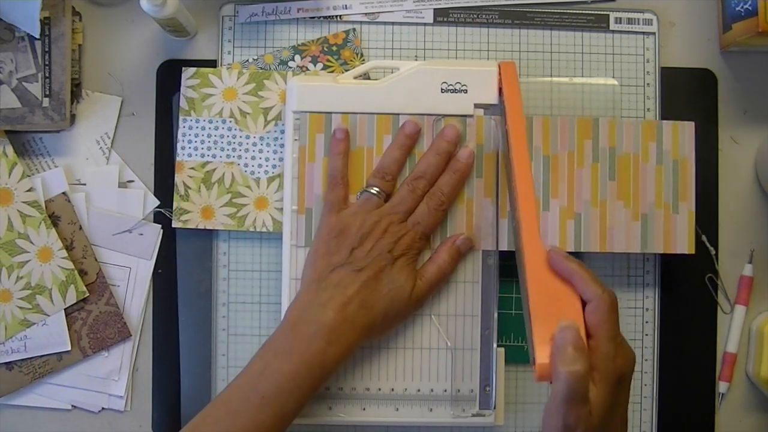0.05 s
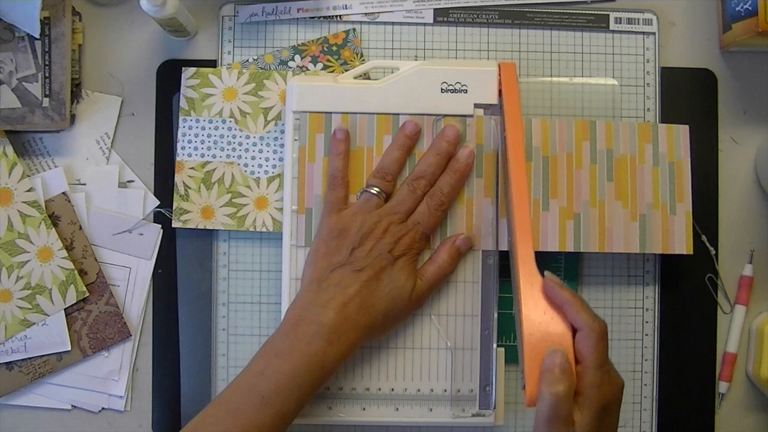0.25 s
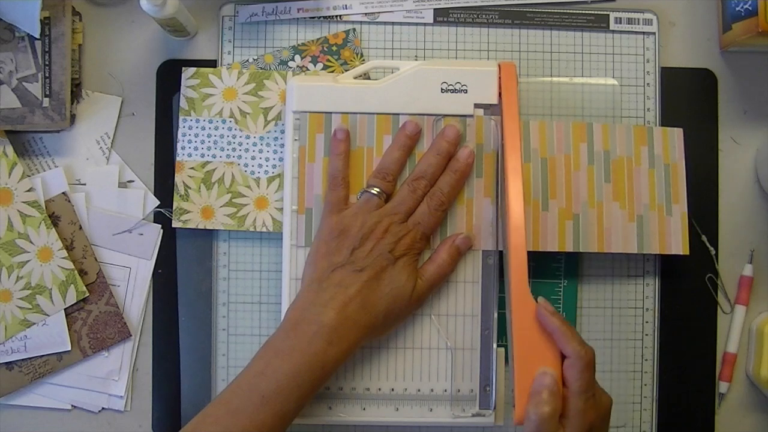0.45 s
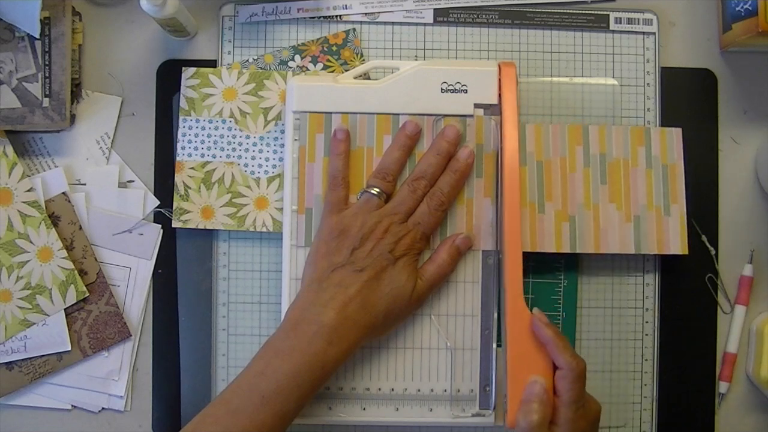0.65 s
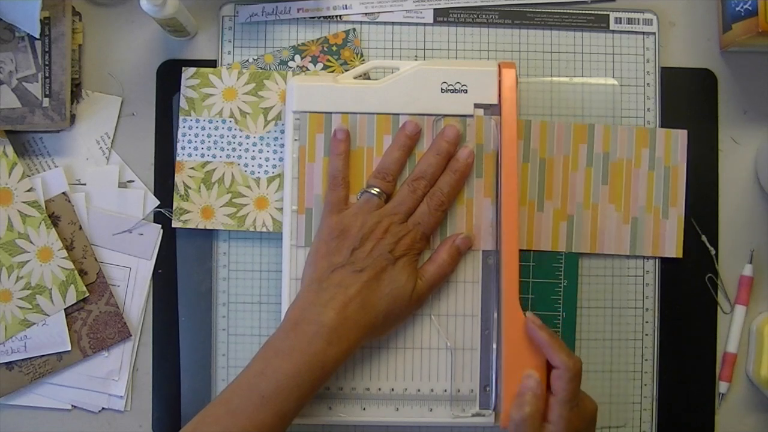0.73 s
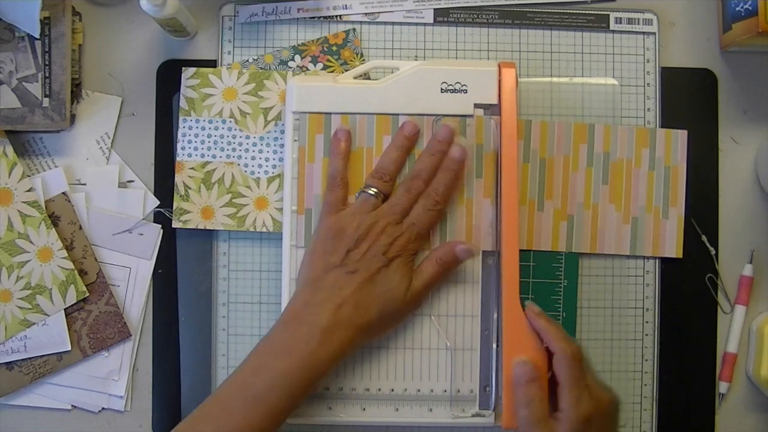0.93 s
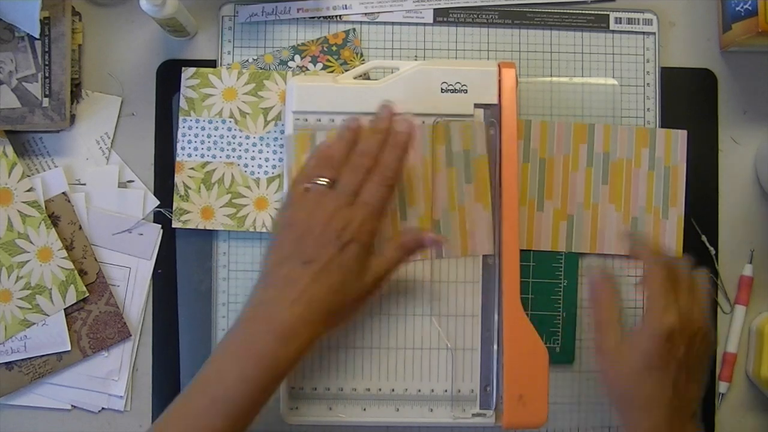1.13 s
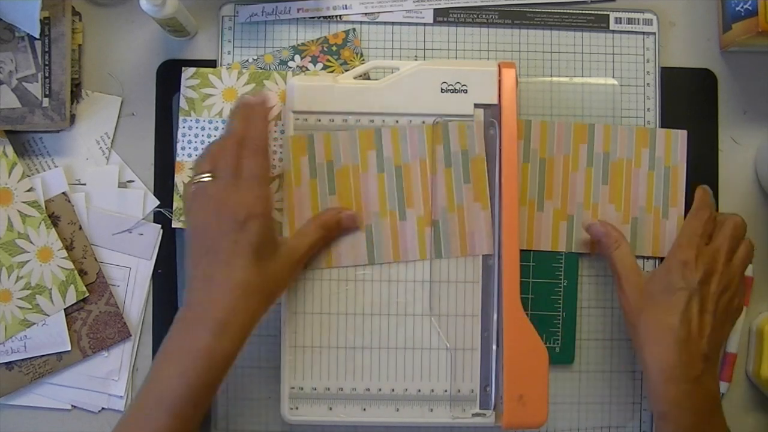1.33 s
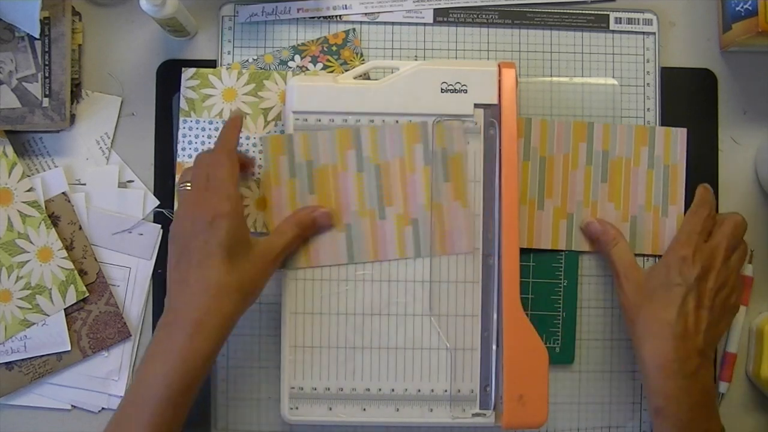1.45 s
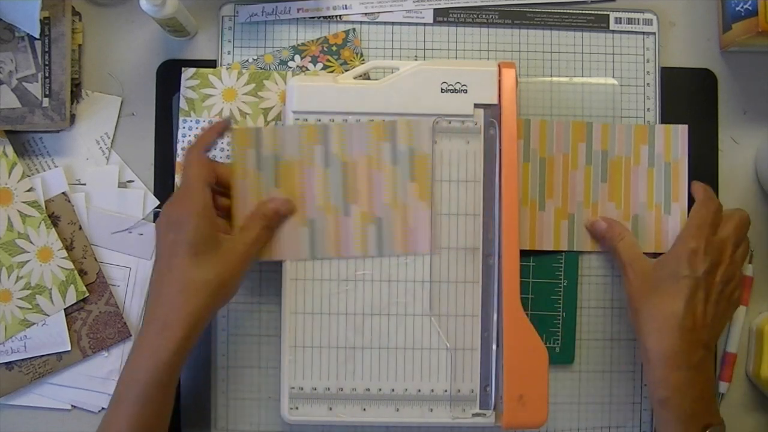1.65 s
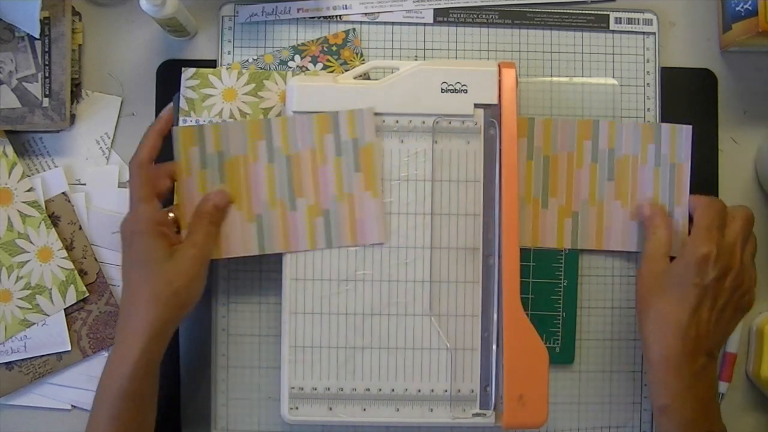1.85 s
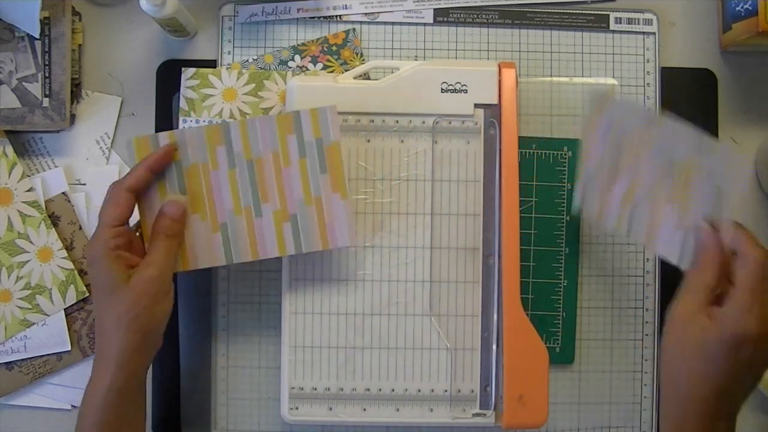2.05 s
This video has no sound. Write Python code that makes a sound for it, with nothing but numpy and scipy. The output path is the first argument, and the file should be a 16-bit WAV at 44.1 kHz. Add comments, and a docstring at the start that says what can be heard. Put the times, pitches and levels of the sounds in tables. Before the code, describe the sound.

A paper trimmer blade crunches through card, knocks down, and the pieces slide away.

```python
"""Paper trimmer cutting card

A lever trimmer on a craft table cuts a strip of card: fibres snap ever harder under the blade and
ring the arm and the plastic bed. The blade scrapes down the steel edge and the lever knocks home.
Fingers brush the card, then the two halves are slid off and lifted, their edges ticking and singing.
A small dry room, a stereo microphone overhead."""
import sys
import numpy as np
from scipy import signal
from scipy.fft import rfft, irfft, next_fast_len
from scipy.io import wavfile
from scipy.ndimage import map_coordinates

SR = 44100
rng = np.random.default_rng(int(sys.argv[2]) if len(sys.argv) > 2 else 0)


def to_wav(s):
    """Save 16-bit WAV."""
    ch = np.atleast_2d(s).T  # columns
    pcm = np.round(np.clip(ch, -1, 1) * 32767)  # PCM
    wavfile.write(sys.argv[1], SR, pcm.astype(np.int16))


N = 92610


def amp(db):
    """Decibels to gain."""
    return 10 ** (np.asarray(db) / 20)


def unit(x):
    """Scaled to rms 1."""
    return x / np.sqrt(np.mean(x ** 2) + 1e-20)


def along(points, hz):
    """Reads (Hz, value) points on a log frequency axis."""
    freqs, values = np.transpose(points)
    return np.interp(np.log(hz + 1), np.log(freqs + 1), values)


def curve(rows):
    """Automation from (s, value) points, one value per sample."""
    return np.interp(np.arange(N) / SR, *np.transpose(rows))


def gate(start, end, attack_s=0.0035, release_db_per_s=497):
    """Opens quickly at the start and dies away after the end."""
    t = np.arange(N) / SR
    return amp(-release_db_per_s * np.maximum(t - end, 0)) * np.clip((t - start) / attack_s, 0, 1)


def stroke(rows):
    """Gain of a movement from its (s, dB) points, gated at both ends."""
    return amp(curve(rows)) * gate(rows[0][0], rows[-1][0])


def crossfades(times):
    """Equal-power fades that each peak at one of the times."""
    return [np.sin(np.pi / 2 * np.interp(np.arange(N) / SR, times, row)) for row in np.eye(len(times))]


def add(track, s, sound):
    """Mixes a sound in at time s."""
    i = round(s * SR)
    track[i:i + len(sound)] += sound[:max(N - i, 0)]


def filtered(x, response):
    """x times a complex response of frequency."""
    size = 2 * next_fast_len(N // 2 + 8192)
    return irfft(rfft(x, size) * response(np.fft.rfftfreq(size, 1 / SR)), size)[..., :N]


def coloured(x, points):
    """x through a minimum-phase EQ with the given (Hz, dB) shape."""
    def response(hz):
        cepstrum = irfft(np.log(amp(along(points, hz))))
        half = len(cepstrum) // 2
        cepstrum[1:half] *= 2
        cepstrum[half + 1:] = 0
        return np.exp(rfft(cepstrum))
    return filtered(x, response)


def resonance(x, hz, width_hz):
    """x through a steep-sided resonance, at rms 1."""
    return unit(filtered(x, lambda f: (1j * f * width_hz / (hz * hz - f * f + 1j * f * width_hz)) ** 2))


def scatter(x, t60):
    """x smeared by a dense cluster of close reflections."""
    t = np.arange(SR // 8) / SR
    tail = rng.standard_normal(len(t)) * amp(-60 * t / t60) * (t > .0004)
    return signal.fftconvolve(x, tail / np.linalg.norm(tail))[:N]


def spread(x, t60, early_db, early_from_hz=970):
    """Stereo image: direct sound, the table's reflections in the treble, width growing with pitch."""
    # stereo width, side against direct sound: freq_hz, gain_db
    width = [(100, -13.5), (400, -14.5), (800, -14.5), (1500, -9.5), (3000, -5.5), (8000, -3.5),
             (14000, -2.5)]
    early = filtered(scatter(x, t60), lambda hz: 1 - 1 / (1 + (hz / early_from_hz) ** 2))
    mid = x + amp(early_db) * early
    side = filtered(scatter(x, t60), lambda hz: amp(along(width, hz)))
    return np.array([mid + side, mid - side]) / np.hypot(1, amp(early_db) / 2)


def pan(x, db):
    """Left louder than right by db."""
    return x * amp(np.array([[.5], [-.5]]) * db)


def snaps(per_s, vary_db, hiss):
    """Random tiny impulses of uneven size over smooth friction noise."""
    chance, size, polarity = rng.random(N), rng.standard_normal(N), np.sign(rng.standard_normal(N))
    impulses = (chance < per_s / SR) * polarity * amp(vary_db * np.clip(size, -2, 2))
    return unit(unit(impulses) + hiss * rng.standard_normal(N))


def rub(colour, per_s, vary_db, hiss):
    """Steady stereo friction of rms 1: small slips through a surface's colour."""
    return unit(spread(coloured(snaps(per_s, vary_db, hiss), colour), t60=0.027, early_db=-3))


def clicks(rows, colour, t60):
    """A short burst of slips at each (s, dB) row."""
    track, t = np.zeros(N), np.arange(SR // 10) / SR
    for s, db in rows:
        add(track, s, amp(db - 60 * t / t60) * rng.standard_normal(len(t)))
    return spread(coloured(track, colour), t60=0.25, early_db=-8.5)


def room_tone():
    """The room's steady noise, at rms 1."""
    # noise floor: freq_hz, gain_db
    colour = [(18, -81.5), (30, -56.5), (295, -16), (486, -13), (684, -5), (2060, -3.5), (2980, -14.5),
              (3310, 0), (4190, -16.5), (10200, -22.5), (16000, -42)]
    return unit(spread(coloured(rng.standard_normal(N), colour), t60=.03, early_db=-6.5))


def room_reverb(x):
    """A short tail; each frequency dies at its own speed."""
    # the room's decay: freq_hz, t60_s
    decay = [(200, 0.18), (2000, 0.15), (10000, 0.073)]
    hz, t, spectrum = signal.stft(rng.standard_normal((2, SR // 2)), SR, nperseg=256)
    tail = signal.istft(spectrum * amp(-60 * t / along(decay, hz)[:, None]), SR, nperseg=256)[1]
    return signal.fftconvolve(x, tail / np.linalg.norm(tail[0]), axes=1)[:, :N]


def card_whistle(half_width_hz=380):
    """The card's dragging edge sings thinly: a narrow band of friction that sinks in pitch."""
    # the singing edge: time_s, pitch_hz, level_db
    glide = [(1.86, 7600, -38), (1.89, 7500, -50), (1.931, 7440, -47), (1.97, 7300, -40), (2.0, 7460, -41),
             (2.051, 7340, -56), (2.075, 7060, -46), (2.1, 6960, -58)]
    glide = np.array(glide)
    pitch_hz = curve(glide[:, :2])
    flutter = filtered(rng.standard_normal(N), lambda hz: 1 / (1 + (hz / half_width_hz) ** 2))
    tone = unit(flutter * np.sin(2 * np.pi * np.cumsum(pitch_hz) / SR))
    return spread(tone * stroke(glide[:, ::2]), t60=0.037, early_db=-15)


def card_ring():
    """Rubbing wakes the stiff card's resonance once it is off the bed."""
    # swell of the ring: time_s, level_db
    envelope = [(1.79, -42), (1.835, -29), (1.865, -32), (1.9, -42.5), (1.95, -47), (1.98, -58), (2.0, -38),
                (2.04, -70), (2.07, -50), (2.1, -37)]
    ring = resonance(snaps(per_s=1600, vary_db=6.3, hiss=.4), hz=2200, width_hz=460)
    return spread(ring * stroke(envelope), t60=0.026, early_db=-9)


def finger_brush():
    """Fingers brush the card with a high, grainy hiss."""
    # finger strokes: time_s, level_db
    envelope = [(1.05, -47), (1.085, -35), (1.11, -25.5), (1.125, -47.5), (1.15, -41.5), (1.18, -54),
                (1.215, -43), (1.25, -54), (1.275, -100), (1.301, -88), (1.305, -34.5), (1.318, -45),
                (1.37, -42), (1.42, -47.5), (1.6, -49), (1.63, -43), (1.65, -61)]
    # skin on card: freq_hz, gain_db
    colour = [(1180, -78), (2000, -48.5), (3090, -23.5), (5350, -38), (5490, -18), (8480, -5), (11700, -2),
              (16000, -24)]
    return stroke(envelope) * rub(colour, per_s=4900, vary_db=20, hiss=0.71)


def card_slide():
    """The card slides over the bed with an even rasp."""
    # the push: time_s, level_db
    envelope = [(1.405, -52), (1.421, -23), (1.453, -31), (1.487, -29), (1.497, -20.5), (1.513, -19),
                (1.559, -32.5), (1.565, -30.5), (1.639, -53.5), (1.665, -63.5)]
    # card on plastic: freq_hz, gain_db
    colour = [(100, -33.5), (200, -43), (300, -9.5), (500, -7), (720, 0), (1000, -4.5), (1600, -0.5),
              (2400, 1), (3300, 0.5), (4300, -5.5), (7000, -7.5), (11500, -7.5), (13500, -18),
              (15500, -22.5)]
    return pan(stroke(envelope) * rub(colour, per_s=2400, vary_db=0.5, hiss=0.47), db=1.3)


def card_lift():
    """Both halves are drawn away; their friction loses its bass as they leave the bed."""
    # the pull: time_s, level_db
    envelope = [(1.675, -69), (1.687, -40.5), (1.711, -29), (1.754, -27.5), (1.759, -27), (1.803, -31),
                (1.831, -23), (1.951, -43.5), (1.985, -45.5), (1.995, -36), (2.053, -52.5), (2.065, -32.5),
                (2.1, -32)]
    # card lying flat, then raised: freq_hz, gain_db
    flat = [(88, -68), (150, -49), (494, -5), (589, -0.5), (1040, 1), (1120, -3), (2100, -4.5),
            (3420, -14.5), (4320, -5.5), (6510, -11), (11300, -9), (16000, -26.5)]
    raised = [(200, -54), (500, -28), (700, -16), (1000, -6.5), (1500, -2), (2150, -4.5), (3000, -6.5),
              (4000, -5), (6000, -5.5), (7500, -9.5), (8700, -5), (10800, -4), (13000, -13), (15500, -19)]
    # leaving the bed: flat_s, raised_s
    stages = [1.794, 1.807]
    # drift to the right and back: time_s, left_over_right_db
    drift = [(1.7, 0), (1.85, -1), (1.95, -1.5), (1.995, -7), (2.06, -0.5)]
    friction = sum(fade * rub(colour, per_s=1800, vary_db=5, hiss=0.34)
                   for fade, colour in zip(crossfades(stages), [flat, raised]))
    return pan(amp(-1.1) * stroke(envelope) * friction, db=curve(drift))


def card_ticks():
    """The card's edge ticks crisply as it is handled."""
    # edge ticks: start_s, level_db
    hits = [(1.087, -20), (1.099, -38.5), (1.108, -20), (1.420, -12.5), (1.492, -12.5), (1.509, -28.5),
            (1.583, -22), (1.7565, -16.5), (1.989, -23), (2.066, -37)]
    # their crisp tone: freq_hz, gain_db
    colour = [(150, -56), (500, -37.5), (2000, -27), (4000, 4), (6000, 5.5), (11500, -17.5), (16000, -17)]
    return amp(-2) * clicks(hits, colour, t60=0.017)


def body_knocks(attack_s=0.0023, clatter_t60_s=0.051):
    """Each contact rings the body's modes around its own centre, with a short clatter."""
    # modes of the trimmer's body: pitch_hz, level_db, t60_s
    modes = [(302, -12.5, 0.12), (457, -3, 0.049), (536, 0, 0.033), (731, 4, 0.059), (948, 0.5, 0.05),
             (1210, -4.5, 0.042), (1270, -14, 0.13), (1835, -3.5, 0.053), (2033, 5, 0.037),
             (2350, -14, 0.081), (3330, 5.5, 0.024)]
    # lever, hand and card landing: start_s, level_db, centre_hz, width_octaves, clatter_db, decay_ratio
    hits = [(.981, -20.5, 2120, .3, -12, 0.67), (1.001, -28, 3420, 0.34, -31, 1.6),
            (1.0, -28.5, 596, 1.43, 8, 0.95), (1.014, -16.5, 604, 1.2, 4, 0.62),
            (1.0595, -15.5, 1760, 1.25, -0.5, 0.81), (1.092, -15.5, 740, .3, -13.5, 0.34),
            (1.103, -18, 1860, 0.12, -6, 1.1), (1.108, -22.5, 497, 1.6, -5, 0.44),
            (1.155, -10, 554, 0.25, -7, 0.76), (1.156, -19.5, 1620, 0.32, -9.5, 0.68),
            (1.289, -53.5, 565, 0.94, 7, 1.6), (1.361, -22.5, 2230, 0.54, -15, 1.06),
            (1.362, -37, 715, 0.61, 3, 1.5), (1.421, -16.5, 290, 1.17, -8, 0.74),
            (1.432, -22.5, 300, 1.9, 3, 0.81), (1.519, -26, 414, 0.74, 6.5, 0.86),
            (1.494, -19, 2980, .4, 5, .7), (1.565, -26.5, 1880, .22, 5.5, 1),
            (1.756, -20, 2030, 0.53, 5.5, 0.86), (1.765, -22.5, 1360, 1.17, -1, 1.8),
            (1.915, -21, 2245, 0.14, 2, 0.54), (1.988, -41.5, 1150, 0.19, 7, 0.83),
            (1.988, -34, 3340, 0.22, -5.5, 2.6), (2.094, -18, 933, 0.097, 8, 0.33)]
    track, t = np.zeros(N), np.arange(SR // 5) / SR
    hz = np.fft.rfftfreq(len(t), 1 / SR) + 1
    for s, db, centre_hz, octaves, clatter_db, decay_ratio in hits:
        def band(f):
            return 1 / (1 + (np.log2(f / centre_hz) / octaves) ** 4)
        ring = 0
        for pitch_hz, mode_db, t60 in modes:
            decay = amp(mode_db + rng.normal(0, 1) - 60 * t / (t60 * decay_ratio))
            ring += band(pitch_hz) * decay * np.sin(2 * np.pi * (pitch_hz * t + rng.random()))
        noise = unit(irfft(rfft(rng.standard_normal(len(t))) * band(hz), len(t)))
        clatter = noise * amp(clatter_db - 60 * t / (clatter_t60_s * decay_ratio))
        add(track, s, amp(db - 8) * (ring + clatter) * (1 - np.exp(-t / attack_s)))
    colour = [(60, -22.5), (220, 3.0), (5000, 6.5), (12000, -27)]  # freq_hz, gain_db
    return spread(coloured(track, colour), t60=0.0082, early_db=-11)


def blade_scrape(treble_hz=3700):
    """Past the card the blade rubs the steel edge, brighter when pressed, and catches now and then."""
    # the blade's run down the edge: time_s, level_db, treble_db
    run = [(0.73, -57, 0), (0.77, -25.5, -0.5), (0.815, -24, 10.5), (0.832, -19.5, 8.5), (0.843, -24.5, 1),
           (0.865, -25.5, -3), (0.883, -20, 6), (0.904, -25.5, -4.5), (0.923, -23.5, -8),
           (0.972, -32.5, -8), (0.991, -35, -22), (1.05, -37.5, -14), (1.106, -31.5, -16),
           (1.138, -49, -2.5), (1.27, -70, -11.5)]
    # steel on steel: freq_hz, gain_db
    steel = [(100, -26.5), (200, -28.5), (400, -13.5), (700, 3.5), (950, -3), (1300, 3), (2300, 2),
             (2900, -4), (3300, -0.5), (5000, -10), (6000, -12.5), (9000, -14), (12000, -20.5),
             (15500, -37)]
    # the edge catches and slips: start_s, level_db
    catches = [(0.758, -19.5), (0.912, -13.5), (0.922, -28), (0.947, -22.5), (0.961, -19.5), (0.999, -17),
               (1.036, -28), (1.045, -25.5)]
    # tone of a catch: freq_hz, gain_db
    catch_colour = [(200, -26), (1000, -24.5), (3500, 4), (5000, -10), (6700, 0), (9000, -3.5),
                    (10300, -12), (12000, -5.5), (16000, -31)]
    run = np.array(run)
    level, treble_gain = stroke(run[:, :2]), amp(curve(run[:, ::2]))
    friction = rub(steel, per_s=1800, vary_db=2, hiss=0.8)
    treble = filtered(friction, lambda hz: 1 - 1 / (1 + (hz / treble_hz) ** 4))
    rubbing = level * (friction + (treble_gain - 1) * treble)
    return pan(rubbing, db=1) + clicks(catches, catch_colour, t60=0.036)


def blade_bite():
    """The blade first bites the card with a thin steely tick."""
    # first contact: start_s, level_db
    hits = [(.097, -27)]
    # its steely tone: freq_hz, gain_db
    colour = [(300, -47), (1400, -29), (2100, -10), (2900, -24), (3310, 12.5), (3800, -33), (8000, -6.5),
              (11500, -12), (13000, -31)]
    return clicks(hits, colour, t60=0.067)


def arm_judders(swell_s=0.0083):
    """Each judder of the arm swells the bed's hollow note and lets it die."""
    # booms of the bed: start_s, peak_db, pitch_hz
    booms = [(.131, -44.5, 714), (.211, -24.5, 710), (.265, -22, 740), (.298, -25.5, 754),
             (.356, -27.5, 734), (.451, -13.5, 769.5), (.491, -19.5, 731), (.533, -14, 739),
             (.562, -16.5, 739), (.587, -14.5, 728), (.692, -20, 720), (.779, -29, 713)]
    track, t = np.zeros(N), np.arange(SR // 8) / SR
    swell = (t / swell_s * np.exp(1 - t / swell_s)) ** 2
    for s, db, hz in booms:
        add(track, s, amp(db) * swell * np.sin(2 * np.pi * (hz * t + rng.random())))
    return pan(track, db=1.9)


def bed_rumble():
    """The hollow plastic bed rumbles under the cut."""
    # the bed's bass against the cut: time_s, level_db
    envelope = [(0.1, -45), (0.2, -67), (0.23, -24), (0.35, -38), (0.45, -16), (0.62, -22.5), (0.73, -14),
                (0.78, -26)]
    # hollow plastic: freq_hz, gain_db
    colour = [(30, -23), (110, -29.5), (200, -11), (430, 11.5), (560, 9.0), (900, -28.5), (3000, -61.5)]
    rumble = coloured(snaps(per_s=1300, vary_db=5.5, hiss=1), colour)
    return pan(amp(curve(envelope)) * unit(spread(rumble, t60=0.023, early_db=-17.5)), db=2.5)


def arm_ring():
    """The travelling cutting point wakes one resonance of arm and blade after another, in mono."""
    # resonances of arm and blade: pitch_hz, width_hz, level_db, peak_s, reach_s
    modes = [(742.4, 51, -15, 0.49, 0.43), (584, 220, -15.5, .71, 0.11), (1156, 60, -18, 0.35, .2),
             (1302, 84, -13, .68, 0.11), (1675, 93, -7.5, .61, 0.12), (1903, 55, -4.5, 0.447, 0.051),
             (2072, 170, -9, 0.17, 0.21), (2383, 170, -4.5, 0.713, 0.04), (3082, 36, -11.5, .41, 0.078),
             (3295, 120, -8.5, 0.14, 0.24), (3496, 170, -18.5, .57, .05), (4037, 57, -13.5, 0.698, 0.078),
             (4520, 120, -16, .16, .1), (4770, 240, -12, .63, 0.066), (5990, 110, -20, .21, 0.26),
             (6600, 600, -7.5, .74, .04), (8000, 870, -11.5, .66, .05), (8950, 810, -13.5, .51, .07),
             (10400, 900, -14.5, .41, .06)]
    t = np.arange(N) / SR
    shaking = snaps(per_s=1600, vary_db=0.5, hiss=0.81)
    return sum(amp(db) * np.exp(-((t - peak_s) / reach_s) ** 2) * resonance(shaking, hz, width_hz)
               for hz, width_hz, db, peak_s, reach_s in modes)


def fibre_cracks():
    """Tough bundles of fibres crack under the blade."""
    # bundles giving way: start_s, level_db
    hits = [(.456, -17.5), (.6, -18), (.648, -14.5), (.6655, -10), (.671, -9.5), (.7015, -4), (.7215, -17),
            (.738, -25.5)]
    # tone of a crack: freq_hz, gain_db
    colour = [(80, -36), (200, -18.5), (600, -8), (1700, 5.5), (3000, -0.5), (4800, 8), (15500, -12.5)]
    return clicks(hits, colour, t60=0.0061)


def fibre_crunch(clumps_per_s=260, clump_db=1.2):
    """Fibres snap in clumps, changing colour as the cut travels away from the pivot."""
    # the cut near the pivot, midway and at the far edge: freq_hz, gain_db
    near = [(100, -41.5), (200, -31.5), (600, -13), (950, -10.5), (1200, -7.5), (2200, 4.5), (2750, -16),
            (3600, -11), (6000, -13.5), (11700, -13.5), (13000, -30), (15500, -29.5)]
    midway = [(100, -53), (200, -14), (400, -16), (700, -2.5), (950, -12), (1250, -1), (2100, -2),
              (2750, -8.5), (5500, -14), (9000, -17.5), (13000, -28.5), (15500, -31)]
    far = [(100, -45), (200, -22.5), (400, -9), (600, 4.5), (930, -3.5), (1300, 1.5), (2300, 0), (3200, -8),
           (4850, -9.5), (6100, -18.5), (8700, -13), (11000, -12), (15500, -31.5)]
    # when each colour leads: near_s, midway_s, far_s
    stages = [0.12, 0.53, 0.61]
    t = np.arange(N) / SR
    clumps = amp(clump_db * map_coordinates(rng.standard_normal(N), [t * clumps_per_s], order=1))
    fibres = unit(snaps(per_s=1600, vary_db=0.5, hiss=0.55) * clumps)
    return sum(fade ** 2 * unit(spread(coloured(fibres, colour), t60=.06, early_db=1))
               for fade, colour in zip(crossfades(stages), [near, midway, far]))


def blade_cut():
    """The growing force of the blade drives the fibres, the arm and the bed together."""
    # force of the cut: time_s, level_db
    force = [(0.1, -46), (0.114, -32.5), (0.168, -32), (0.224, -22), (0.348, -20.5), (0.466, -14),
             (0.504, -14), (0.68, -11), (0.78, -23.5)]
    crunch, ring, rumble = fibre_crunch(), arm_ring(), bed_rumble()
    layers = amp(-1.5) * crunch + spread(ring, t60=.02, early_db=-15.5) + rumble
    return layers * amp(curve(force)) * gate(start=0.1016, end=0.765)


def scene():
    """Cut, scrape, knocks and card handling in the room, over faint room tone."""
    direct = blade_bite() + blade_cut() + fibre_cracks() + arm_judders()
    direct += card_ring() + blade_scrape() + body_knocks()
    direct += finger_brush() + card_slide() + card_lift() + card_ticks() + card_whistle()
    return direct + amp(-67.5) * room_tone() + amp(-8.5) * room_reverb(direct)


def record(dry, low_cut_hz=214, top_hz=15850):
    """The microphone sheds the deep bass, peaks are rounded at full scale, the very top is cut off."""
    thin = signal.sosfilt(signal.butter(2, low_cut_hz, "high", fs=SR, output="sos"), dry)
    rounded = thin / (1 + np.abs(thin) ** 12) ** (1 / 12)
    return filtered(rounded, lambda hz: hz < top_hz)


dry = scene()
out = record(dry)
to_wav(out)
```